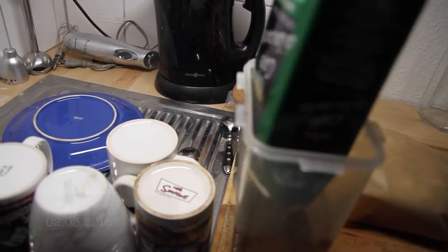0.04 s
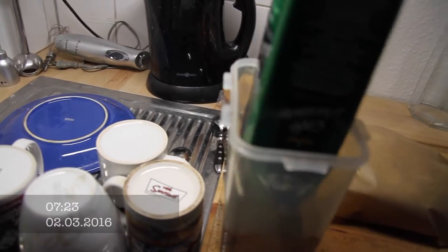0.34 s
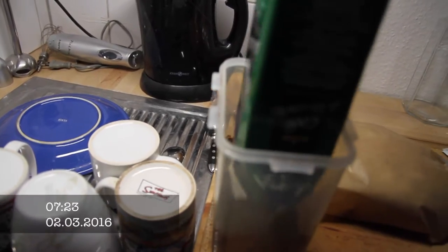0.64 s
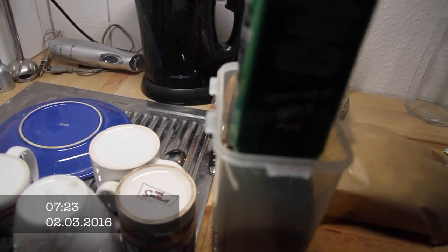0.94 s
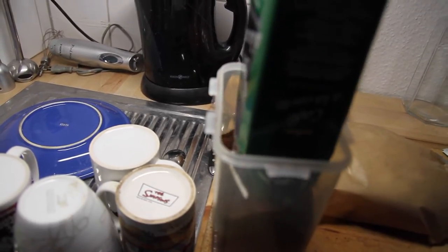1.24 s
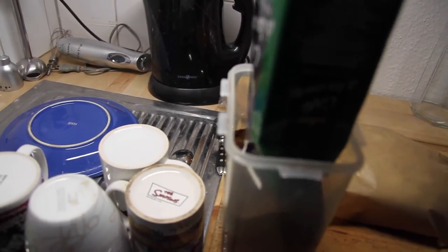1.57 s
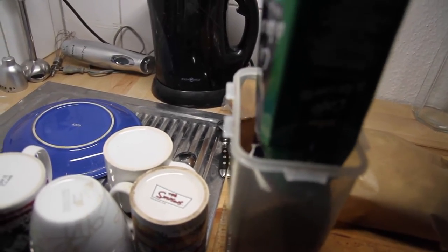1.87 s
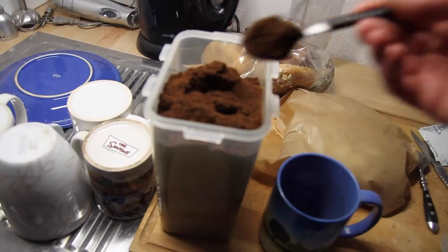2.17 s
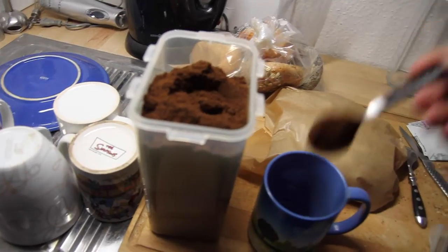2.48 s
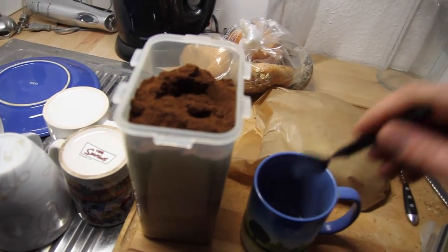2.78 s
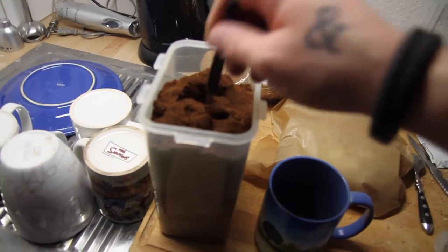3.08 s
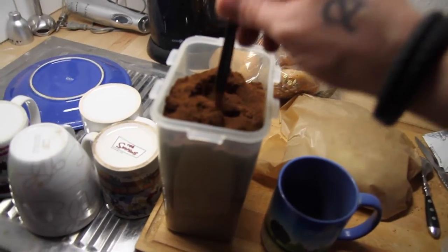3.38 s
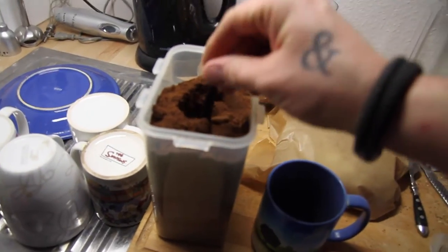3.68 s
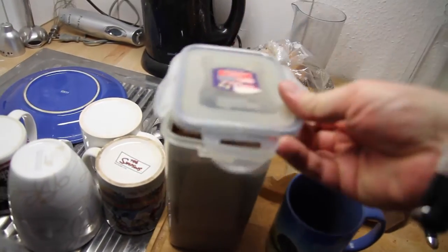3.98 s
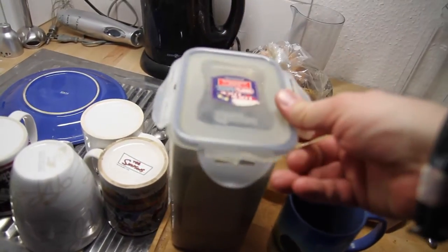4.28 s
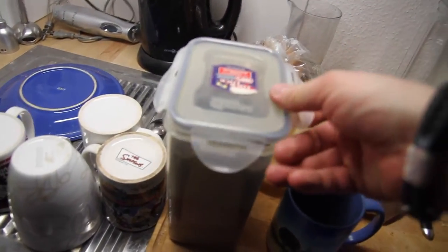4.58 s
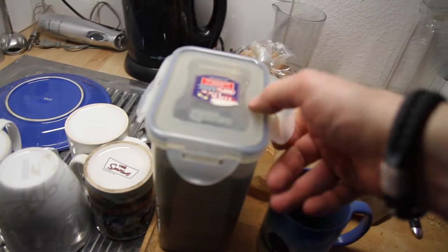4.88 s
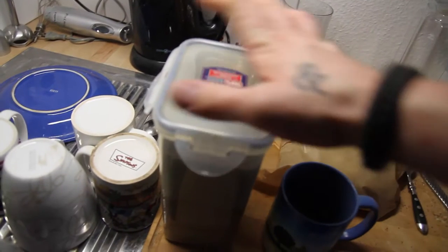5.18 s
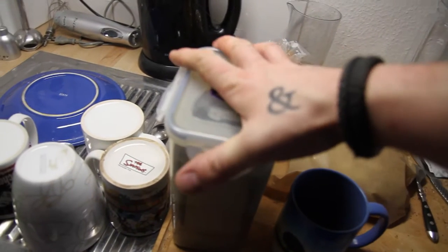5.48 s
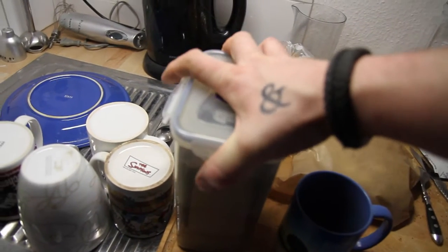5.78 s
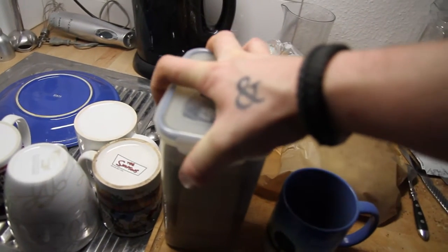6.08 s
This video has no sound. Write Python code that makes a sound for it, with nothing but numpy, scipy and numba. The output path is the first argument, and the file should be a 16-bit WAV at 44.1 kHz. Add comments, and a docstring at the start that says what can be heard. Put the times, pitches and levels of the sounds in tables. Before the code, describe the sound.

Ground coffee pours from a crinkling foil bag into a plastic tub, then a lid rattles on and two latches snap shut.

```python
"""On a worktop in a small kitchen, ground coffee slides from a foil bag into a tall plastic container.
Countless grain impacts hiss and patter; the foil's creases tick and the bag bumps the tub's walls.
A spoon rings a mug and scrapes in the powder. The lid is set on and pressed down, and two latches snap
shut, each blow exciting the damped modes of tub and lid. A hand-held camera close by adds handling
rumble, overloads on the snaps and turns its gain down after them."""
import sys
import numpy as np
from scipy import signal
from scipy.fft import rfft, irfft, next_fast_len
from scipy.io import wavfile
from scipy.ndimage import uniform_filter1d
from numba import njit

SR = 44100
rng = np.random.default_rng(int(sys.argv[2]) if len(sys.argv) > 2 else 0)


def to_wav(s):
    """Save 16-bit WAV."""
    ch = np.atleast_2d(s).T  # columns
    pcm = np.round(np.clip(ch, -1, 1) * 32767)  # PCM
    wavfile.write(sys.argv[1], SR, pcm.astype(np.int16))


N = 270333
T = np.arange(N) / SR
RING_T = T[:SR // 3]  # time axis of one impact


def undb(db):
    """Decibels to amplitude ratio."""
    return 10 ** (np.asarray(db) / 20)


def curve(rows):
    """Linear interpolation of (time, value) rows over the scene."""
    return np.interp(T, *np.transpose(rows))


def at(hz, rows, column=1):
    """Interpolation of a column on a log-frequency axis."""
    rows = np.array(rows)
    return np.interp(np.log(hz + 1), np.log(rows[:, 0]), rows[:, column])


def colour(x, spectrum):
    """Minimum-phase filtering to a given spectrum; the result has rms 1."""
    size = next_fast_len(len(x), True) * 2
    hz = np.arange(size // 2 + 1) * SR / size
    cepstrum = irfft(np.log(undb(at(hz, spectrum))))
    response = np.exp(rfft(2 * cepstrum[:size // 2], size))
    y = irfft(rfft(x, size) * response)[:len(x)]
    return y / np.std(y)


def band(x, hz, kind, order=2):
    """Butterworth filter."""
    sos = signal.butter(order, np.minimum(hz, SR / 2 - 100), kind, fs=SR, output="sos")
    return signal.sosfilt(sos, x)


def noise(size=N):
    """White noise."""
    return rng.standard_normal(size)


def fade(t60):
    """Exponential decay by 60 dB in t60 seconds."""
    return np.exp(-np.log(1000) * RING_T / t60)


def burst(x, db):
    """Energy scaling: spread over 20 ms, the sound would have level db."""
    return x * undb(db) / np.sqrt(np.sum(x ** 2) / (.02 * SR))


def add(out, s, x):
    """Superposition of a short sound at time s."""
    i = max(int(s * SR), 0)
    out[i:i + len(x)] += x[:max(N - i, 0)]


def wander(rate_hz):
    """Smooth random fluctuation with standard deviation 1."""
    step = int(SR / rate_hz)
    y = uniform_filter1d(np.repeat(noise(N // step + 1), step), step)[:N]
    return y / np.std(y)


def grains(per_s, spread_db):
    """Shot noise: tiny impacts of random size at random times."""
    size = undb(spread_db * np.minimum(rng.exponential(size=N), 6))
    return (rng.random(N) < per_s / SR) * noise() * size


def ring(modes, scatter_db):
    """Free vibration: a sum of damped modes, weighted and detuned a little at each contact."""
    out = 0
    for hz, db, t60 in modes:
        amplitude = undb(db + scatter_db * rng.normal())
        detuned_hz = hz * (1 + 0.0095 * rng.normal())
        out = out + amplitude * fade(t60) * np.sin(2 * np.pi * detuned_hz * RING_T)
    return out


def swell(s, db, rise_s, fall_s):
    """Power envelope of a movement that peaks at time s."""
    distance = np.maximum((s - T) / rise_s, (T - s) / fall_s)
    near = distance < 10
    power = np.zeros(N)
    power[near] = (undb(db) * np.exp(-distance[near] ** 1.13)) ** 2  # 1.13: a fairly pointed peak
    return power


def strokes(rows):
    """Incoherent addition: the amplitude envelope of symmetric swells whose powers sum."""
    return np.sqrt(sum(swell(s, db, half_s, half_s) for s, db, half_s in rows))


# Spectrum of the room's hiss. Each row: frequency in Hz, level in dB.
AIR_SPECTRUM = [(100, 1.5), (170, -11), (270, -13), (400, -7), (700, -11.5), (1200, -11), (2000, -14.5),
                (3400, -13), (5000, -22), (9000, -24.5), (15500, -27)]
# Appliance tones. Each row: frequency in Hz, level in dB.
HUM_TONES = [(1346, -55), (2686, -60)]
# The hum fades as the camera turns. Each row: time in seconds, gain in dB.
HUM_GAIN = [(2.5, -3), (2.9, -8.5), (4.5, -4), (4.9, -3), (5.7, -9.5)]

def room_tone():
    """Ambient noise: a broadband hiss under faint, slightly frequency-modulated appliance tones."""
    air = undb(-46.5 + 0.29 * wander(4.8)) * colour(noise(), AIR_SPECTRUM)
    hum = 0
    for hz, db in HUM_TONES:
        phase = 2 * np.pi * np.cumsum(hz * (1 + 0.0026 * wander(30))) / SR
        hum = hum + np.sqrt(2) * undb(db) * np.sin(phase)
    return air + undb(curve(HUM_GAIN)) * hum


# Strength of the handling rumble. Each row: time in seconds, level in dB.
HANDLING_LEVEL = [(0.0, -26), (0.24, -36.5), (1.16, -36.5), (1.59, -39), (1.98, -37), (2.1, -41),
                  (2.71, -44.5), (3.52, -37.5), (3.89, -40), (4.08, -37.5), (5.24, -40.5), (5.46, -32),
                  (5.62, -42), (6.13, -48)]
# Its spectrum. Each row: frequency in Hz, level in dB.
HANDLING_SPECTRUM = [(15, -13), (30, -3), (48, -1.5), (90, -5.5), (130, -17.5), (200, -16.5), (400, -49.5)]

def handling():
    """Structure-borne sound: the hand rumbles through the camera's body."""
    db = curve(HANDLING_LEVEL) - .5 + 1.2 * wander(7.9)
    return undb(db) * colour(noise(), HANDLING_SPECTRUM)


# Spectrum of a faint hiss and low rumble. Each row: frequency in Hz, level in dB.
WIDE_NOISE_SPECTRUM = [(25, 41), (120, 2), (400, 0), (2000, -11.5), (5000, -10.5), (15000, -4)]

def wide_noise():
    """Uncorrelated noise: a faint hiss and low rumble, different in left and right."""
    return undb(-44) * np.array([colour(noise(), WIDE_NOISE_SPECTRUM) for _ in range(2)])


# Spectra of powder sliding, dust spraying and powder landing. Each row: frequency in Hz, level in dB.
HISS_SPECTRUM = [(900, -22.5), (1500, 0), (2200, -4.5), (3400, 0), (4200, -5.5), (5500, -19), (9000, -38)]
SPRAY_SPECTRUM = [(3000, 2), (5000, 0), (7200, 0.5), (10000, -2.5), (13000, -7), (16000, -11)]
PATTER_SPECTRUM = [(60, -19.5), (120, 7.5), (200, -2), (350, 0), (520, 6.5), (660, 1.5), (900, 5.5),
                   (1300, 4), (1900, -12), (3500, -43)]
# Clumps leaving the bag. Each row: peak time in seconds, level in dB, rise and fall in seconds,
# relative level of the patter in dB.
CLUMPS = [(.05, -30, 0.29, 0.076, -2), (.145, -27.5, 0.037, 0.022, -8), (.28, -33.5, 0.18, 0.14, -6),
          (.43, -23.5, 0.16, 0.075, -1), (0.614, -20, .05, 0.026, 0.5), (.76, -33, 0.32, 0.088, -3),
          (.86, -26.5, 0.02, 0.023, 7), (.94, -25.5, 0.03, 0.014, 5), (1.008, -23, 0.052, 0.042, 5),
          (1.093, -22.5, 0.051, 0.038, -2), (1.36, -41, 0.057, 0.055, 1.5), (1.485, -32, 0.064, 0.048, 6),
          (1.555, -34.5, 0.04, 0.1, 11), (1.734, -22, 0.065, 0.093, 4), (1.82, -23, 0.11, 0.049, -10),
          (1.93, -46, 0.055, 0.023, 14.5)]

def pour():
    """Granular flow: clumps and a thin trickle hiss over foil, patter on plastic and trail fine dust."""
    trickle_db, taper_start_s, taper_s = -58.5, 2.04, 0.034
    trickle = (undb(trickle_db) * np.clip(1 - (T - taper_start_s) / taper_s, 0, 1)) ** 2
    sliding = landing = trickle
    dust = trickle * undb(15) ** 2  # the trickle is mostly dust
    for s, db, rise_s, fall_s, patter_db in CLUMPS:
        clump = swell(s, db, rise_s, fall_s)
        sliding = sliding + clump
        landing = landing + clump * undb(patter_db) ** 2
        dust = dust + swell(s, db, rise_s, fall_s * 1.49)  # dust settles more slowly
    hiss = undb(0.5) * np.sqrt(sliding) * colour(grains(per_s=9000, spread_db=-2.5), HISS_SPECTRUM)
    spray = undb(-1) * np.sqrt(dust) * colour(grains(per_s=26000, spread_db=2.0), SPRAY_SPECTRUM)
    patter = np.sqrt(landing) * colour(grains(per_s=3000, spread_db=1.5), PATTER_SPECTRUM)
    return undb(1.77 * wander(70)) * (hiss + spray + patter)


# Modes of the container: the tub's lie low, those of lid and rim high.
# Each row: frequency in Hz, level in dB, time to decay by 60 dB in seconds.
CONTAINER_MODES = [(98, -14, 0.15), (162.5, -17, 0.15), (291, -17, 0.1), (355.8, -1.5, 0.063),
                   (396.6, 2.5, 0.046), (452.6, -3.5, 0.075), (519, -7, 0.08), (781.5, -8, 0.053),
                   (885, 1.5, 0.011), (953, 0, 0.022), (1113, 0, 0.012), (1242, -2.5, 0.032),
                   (1435, -6.5, 0.024), (1554, -6, 0.035), (1945, -3, 0.012), (2190, -4, 0.022)]
TUB_TOP_HZ = 650
TUB_MODES = [mode for mode in CONTAINER_MODES if mode[0] < TUB_TOP_HZ]
LID_MODES = [mode for mode in CONTAINER_MODES if mode[0] >= TUB_TOP_HZ]
# Bag and lid rub the tub. Each row: peak time in seconds, level in dB, half-length in seconds.
WALL_RUBS = [(.02, -32.5, 0.3), (.31, -26.5, 0.073), (.61, -26, 0.14), (.97, -21.5, 0.09),
             (4.03, -25.5, 0.037), (4.397, -28, .018), (4.665, -24.5, 0.023), (5.39, -47, 0.1)]

def rubbing():
    """Stick-slip friction: small irregular slips drive the modes of the tub's walls."""
    slips = grains(per_s=700, spread_db=2.5)
    drumming = signal.fftconvolve(slips, ring(TUB_MODES, scatter_db=0.73))[:N]
    return strokes(WALL_RUBS) * drumming / np.std(drumming)


# Creases of the bag flipping over. Each row: start in seconds, level in dB, centre frequency in Hz.
FOIL_CREASES = [(0.057, -32.5, 6200), (0.223, -24, 1880), (0.404, -24, 3070), (0.56, -23, 2340),
                (0.609, -26, 3500), (.625, -21.5, 2980), (0.848, -29, 2770), (0.86, -21.5, 2540),
                (0.866, -36, 5000), (1.006, -29, 2550), (1.077, -24.5, 1530), (1.104, -47, 3160),
                (1.329, -37.5, 2280), (1.4185, -17.5, 2460), (1.426, -19, 925), (1.468, -17.5, 2430),
                (1.5205, -12, 2140), (1.536, -17.5, 3600), (1.571, -24.5, 1190), (1.599, -30, 2130),
                (1.660, -25.5, 1078), (1.715, -19.5, 1080), (1.843, -29, 980)]

def foil():
    """Buckling: a crease flips with one sharp tick, and the sheet around it flutters briefly."""
    out = np.zeros(N)
    for s, db, hz in FOIL_CREASES:
        tick = .06 * noise(len(RING_T)) * fade(.025)
        tick[0] += 1
        sheet = band(tick, [hz * 0.46, hz * 1.35], "band")
        edge = band(tick, hz, "high")
        add(out, s, burst(sheet, db) + burst(edge, db - 16.5))
    return out


def contact(hardness_hz):
    """Contact force: a softer touch lasts longer and has less treble; loose parts chatter after it."""
    size = SR // 50
    force = 0.055 * noise(size) * fade(0.052)[:size]
    force[0] += 1
    return band(force, hardness_hz * 0.44, "low")


# Spectrum of stiff plastic cracking. Each row: frequency in Hz, level in dB.
CRACK_SPECTRUM = [(600, -13.5), (1500, 0), (2400, -2), (3700, 2), (4500, -2), (5600, -9.5), (7200, -5),
                  (9500, -9), (12000, -9), (16000, -9)]

def blow(lid_db, tub_db, crack_db, hardness_hz, thud_hz):
    """Impact excitation: one force pulse rings tub and lid; dense high modes merge into a crack."""
    force = contact(hardness_hz)
    lift_db, width_octaves = 10, 0.41  # modes near thud_hz stand out
    lifted = [(hz, db + lift_db * np.exp(-(np.log2(hz / thud_hz) / width_octaves) ** 2), t60)
              for hz, db, t60 in TUB_MODES]
    tub = ring(lifted, scatter_db=5.9)
    # the lid's panels move in or out, depending on where it is struck
    lid = sum(rng.choice([-1, 1]) * ring([mode], scatter_db=1.5) for mode in LID_MODES)
    tub, lid = (signal.fftconvolve(part, force)[:len(RING_T)] for part in (tub, lid))
    click_and_buzz = fade(0.01) + undb(-8) * fade(0.08)
    crack = colour(noise(len(RING_T)) * click_and_buzz, CRACK_SPECTRUM)
    return burst(tub, tub_db) + burst(lid, lid_db) + burst(band(crack, hardness_hz, "low"), crack_db)


def knock(lid_db, tub_db, hardness_hz):
    """Impact timbre: a harder contact cracks more, and a heavier one drives lower modes of the tub."""
    crack_db = lid_db - 18 + 11 * np.log2(hardness_hz / 2026)  # 11 dB per octave of hardness
    thud_hz = 382 * 2 ** ((-14 - tub_db) / 49)  # an octave lower per 49 dB
    return blow(lid_db, tub_db, crack_db, hardness_hz, thud_hz)


# The bag meets the wall. Each row: start in seconds, level of the tub in dB.
BAG_BUMPS = [(0.218, -24), (0.318, -22.5), (0.407, -15.5), (0.4751, -14.5), (0.5609, -18.5), (0.863, -21.5),
             (0.893, -29), (0.969, -27), (1.515, -20.5), (1.922, -26.5)]

def bag_bumps():
    """Soft impact: the bag excites the low modes of the tub more than the rim."""
    out = np.zeros(N)
    for s, db in BAG_BUMPS:
        add(out, s, knock(lid_db=db - 11, tub_db=db, hardness_hz=2030))
    return out


# Bag and tub shift their weight. Each row: peak time in seconds, level in dB, half-length in seconds.
WEIGHT_SHIFTS = [(1.14, -30, 0.054), (1.515, -21, .014), (1.75, -36, 0.058), (1.94, -26.5, 0.026),
                 (4.7, -44, .06), (5.32, -28, 0.023), (5.61, -23, 0.016), (6.01, -35, .02)]
# Spectrum of their rumble. Each row: frequency in Hz, level in dB.
WORKTOP_SPECTRUM = [(40, -25), (85, 1.5), (125, 0.5), (185, -4), (280, -26.5), (600, -65.5)]

def worktop():
    """Forced vibration: a shifting load rumbles dully through the worktop."""
    return strokes(WEIGHT_SHIFTS) * colour(noise(), WORKTOP_SPECTRUM)


# Modes of the mug. Each row: frequency in Hz, level in dB, time to decay by 60 dB in seconds.
MUG_MODES = [(471, -38.5, 0.23), (7550, -46, 0.085), (12050, -46, .07), (14400, -53, .07)]

def mug():
    """Free vibration: the mug rings after one light touch of the spoon."""
    out = np.zeros(N)
    add(out, s=2.665, x=ring(MUG_MODES, scatter_db=0))
    return out


# Strokes of the spoon in the powder and of lid and hand on the plastic.
# Each row: peak time in seconds, level in dB, half-length in seconds.
SCRAPE_STROKES = [(3.057, -41, 0.018), (3.103, -40, 0.027), (3.42, -45, 0.085), (3.55, -44, 0.074),
                  (3.99, -31, 0.02), (4.1, -34, 0.021), (4.403, -35.5, 0.019), (4.72, -46.5, 0.41),
                  (5.56, -35.5, 0.063)]
# Their spectrum. Each row: frequency in Hz, level in dB.
SCRAPE_SPECTRUM = [(200, 0.5), (500, 9), (1300, 4.5), (2200, -0.5), (3400, 0.5), (5000, -8), (10000, -12.5),
                   (16000, -20)]

def scraping():
    """Friction noise: dense tiny impacts merge into an uneven, grainy scrape."""
    envelope = strokes(SCRAPE_STROKES) * undb(1.9 * wander(40))
    return envelope * colour(grains(per_s=9000, spread_db=0.9), SCRAPE_SPECTRUM)


# Pitch of a faint whistle. Each row: time in seconds, frequency in Hz.
WHISTLE_PITCH = [(3.34, 12700), (3.53, 13500), (3.64, 12500), (3.71, 13450), (3.78, 12800), (3.84, 13000),
                 (3.91, 13900), (3.98, 13200)]

def whistle():
    """Random modulation: a thin, high tone wavers in pitch and level."""
    peak_s, db, half_s = 3.5, -57, .35
    envelope = strokes([(peak_s, db, half_s)]) * undb(4.5 * wander(45))
    hz = curve(WHISTLE_PITCH) + 110 * wander(400)
    sounding = (T > WHISTLE_PITCH[0][0]) & (T < WHISTLE_PITCH[-1][0])
    return envelope * sounding * np.sin(2 * np.pi * np.cumsum(hz) / SR)


# Knocks on the rim. Each row: start in seconds, lid level in dB, tub level in dB, hardness in Hz.
RIM_KNOCKS = [(3.575, -44, -43, 1700), (3.97, -25, -30, 4730), (4.018, -22.5, -34, 2520),
              (4.082, -32, -46, 5530), (4.1309, -12.5, -16, 3520), (4.147, -39, -21, 2020),
              (4.202, -34.5, -34.5, 4950), (4.237, -39, -25.5, 2020), (4.243, -26, -25.5, 2500),
              (4.304, -42, -32.5, 1700), (4.37, -27.5, -29.5, 2580), (4.4122, -24, -20, 3080),
              (4.521, -64, -36, 1500), (4.65, -34, -26, 2000), (4.661, -27, -27, 2030),
              (4.69, -22, -16.5, 2000), (4.72, -34.5, -24.5, 1490), (4.876, -30, -28, 2000),
              (4.8915, -17, -10.5, 5070), (5.2901, -18, -16, 2900), (5.299, -12.5, -3, 5200),
              (5.310, -24.5, -15.5, 4500), (5.32, -25.5, -18.5, 2220), (5.333, -38.5, -27, 2480),
              (5.441, -38, -36, 4240), (5.851, -44.5, -43.5, 3060), (5.911, -49, -42, 3250)]

def rim_knocks():
    """Impact excitation: the spoon brushes the rim; the lid is set on, shifted and pressed home."""
    out = np.zeros(N)
    for s, lid_db, tub_db, hardness_hz in RIM_KNOCKS:
        add(out, s, knock(lid_db, tub_db, hardness_hz))
    return out


# Two latches shut, the first in two stages. Each row: start in seconds, levels of lid, tub and crack
# in dB, centre of the thud in Hz, lead of the hinge in seconds.
LATCH_SNAPS = [(5.599, -2.5, -0.5, 10, 335, 0.0021), (5.621, -10, -2, 5, 343, 0.003),
               (6.0003, -18.5, -10, -11.5, 513, 0.00615)]

def latches():
    """Snap-through: the hinge gives with a dull thud, then the latch springs hard over the rim."""
    out = np.zeros(N)
    for s, lid_db, tub_db, crack_db, thud_hz, lead_s in LATCH_SNAPS:
        add(out, s - lead_s, knock(lid_db=-25.5, tub_db=-15, hardness_hz=2500))
        add(out, s, blow(lid_db, tub_db, crack_db, hardness_hz=10900, thud_hz=thud_hz))
    return out


# The kitchen's reverberation. Each row: frequency in Hz, level in dB, time to decay by 60 dB in seconds.
REVERB_BANDS = [(102.6, -1.5, 0.53), (343, -2.5, 0.43), (1200, -3.5, 0.34), (2630, 0, 0.28),
                (4300, -7, 0.41), (5560, -3.5, 0.37), (7600, -13.5, 0.35), (13500, 5.5, 0.077)]

def kitchen(x, wet_db):
    """Diffuse reverberation: tiles and cupboards return a tail, each half-octave with its own decay."""
    tail = 0
    edges_hz = 62 * np.sqrt(2) ** np.arange(17)
    for lo, hi in zip(edges_hz, edges_hz[1:]):
        hz = np.sqrt(lo * hi)
        reflections = band(noise(len(RING_T)), [lo, hi], "band")
        tail = tail + undb(at(hz, REVERB_BANDS)) * reflections * fade(at(hz, REVERB_BANDS, column=2))
    tail = tail * np.minimum(RING_T / 0.0033, 1)
    return x + undb(wet_db) * signal.fftconvolve(x, tail / np.linalg.norm(tail))[:N]


def scene():
    """Superposition: left and right are alike except for a faint hiss and low rumble."""
    background = room_tone() + handling() + wide_noise()
    pouring = pour() + rubbing() + foil() + bag_bumps() + worktop()
    closing = mug() + scraping() + rim_knocks() + latches()
    return background + kitchen(pouring + closing, wet_db=-18) + whistle()


@njit
def follow(x, attack_s, release_s):
    """Envelope follower with separate time constants for rise and fall."""
    out, level = np.empty(len(x)), 0.
    for i in range(len(x)):
        level += (x[i] - level) / (SR * (attack_s if x[i] > level else release_s))
        out[i] = level
    return out


def record(dry):
    """Automatic gain control, most sensitive to treble: it ducks after snaps, whose first peaks clip."""
    threshold_db, top_hz = -7.5, 15750
    treble = band(dry[0], 1700, "high", order=1)
    envelope = follow(np.abs(treble), attack_s=0.0016, release_s=0.15)
    envelope = follow(envelope, attack_s=0.0047, release_s=.003)
    gain = 1 / np.maximum(envelope / undb(threshold_db), 1)
    lowpass = signal.ellip(10, .2, 70, top_hz, fs=SR, output="sos")
    return signal.sosfilt(lowpass, np.clip(dry * gain, -1, 1))


dry = scene()
out = record(dry)
to_wav(out)
```